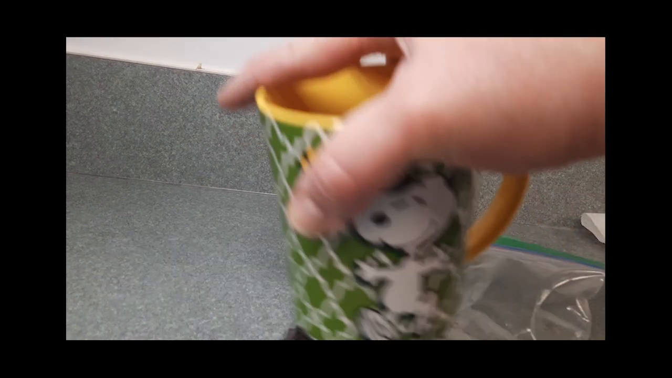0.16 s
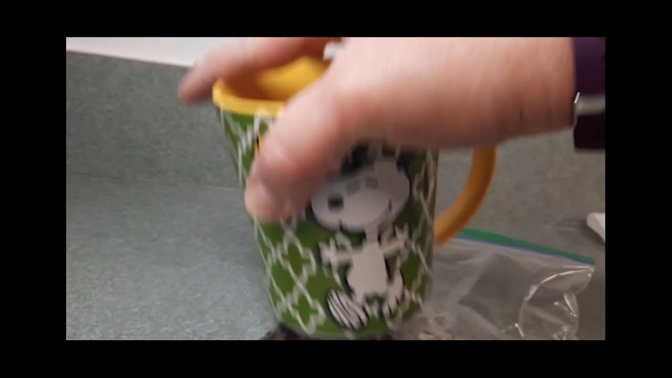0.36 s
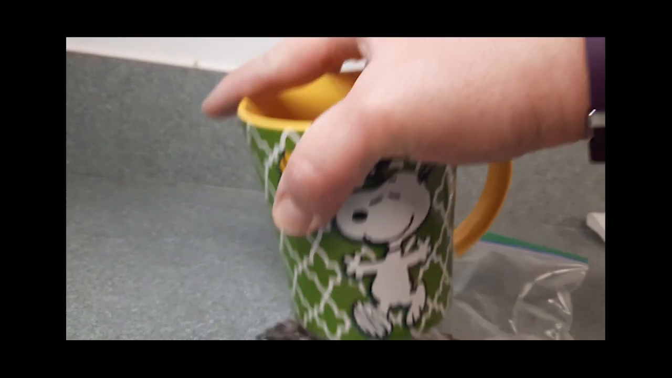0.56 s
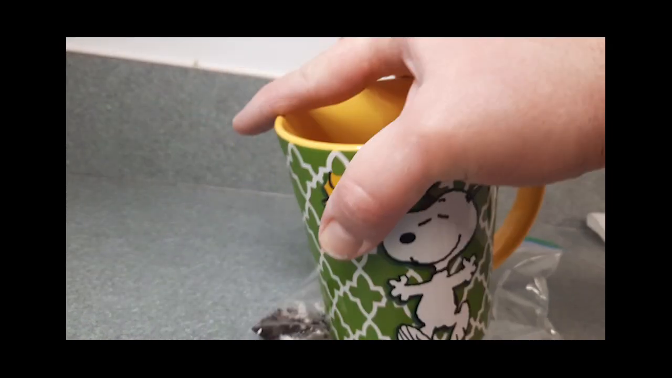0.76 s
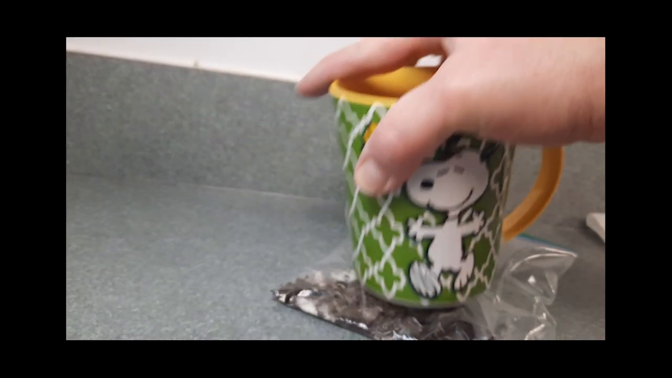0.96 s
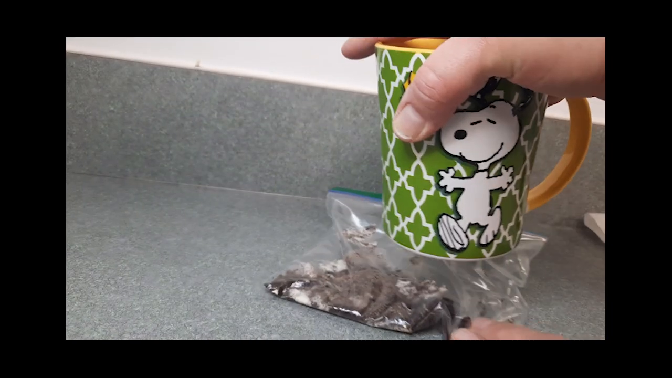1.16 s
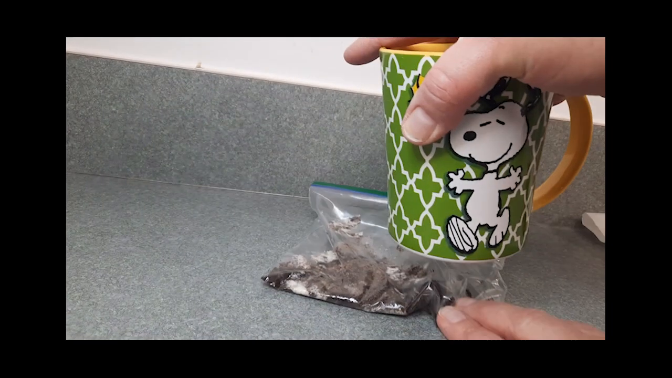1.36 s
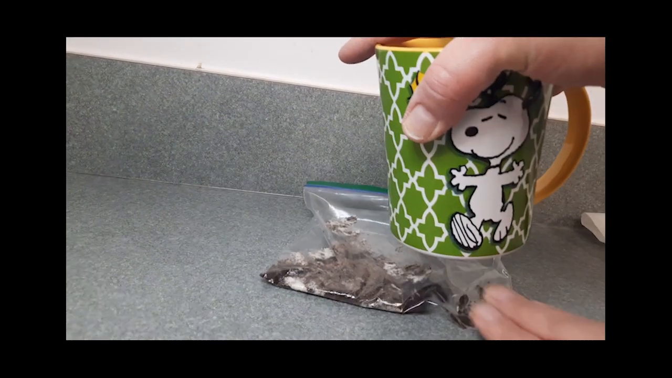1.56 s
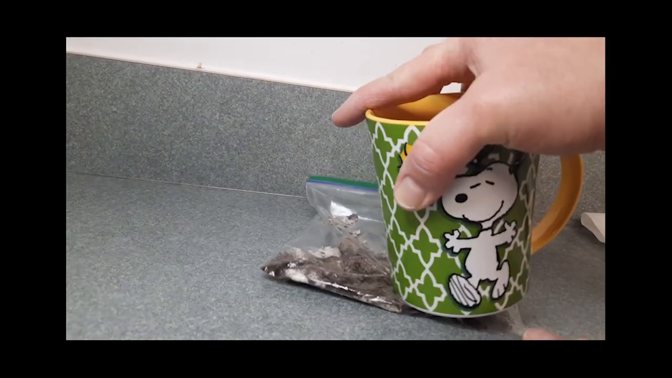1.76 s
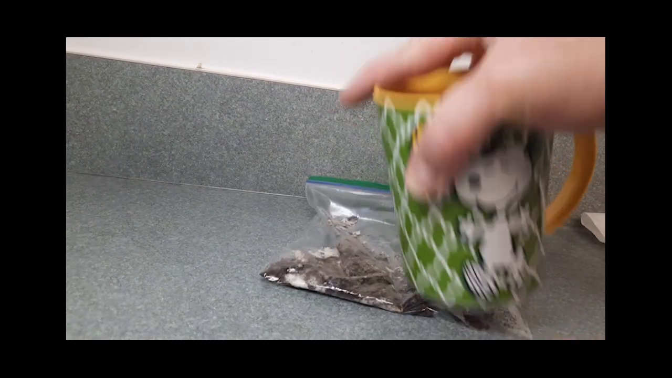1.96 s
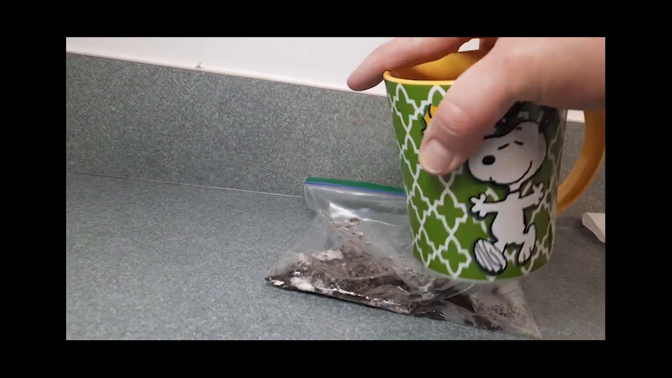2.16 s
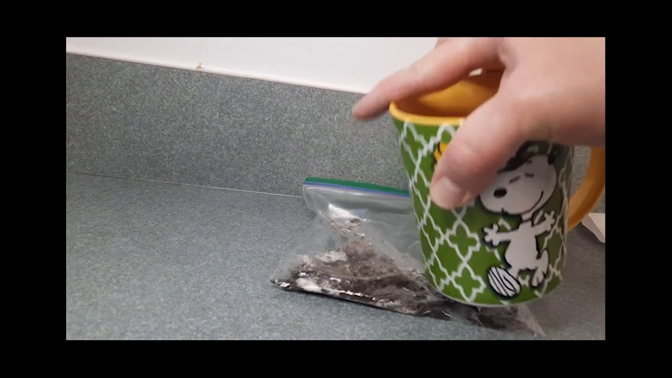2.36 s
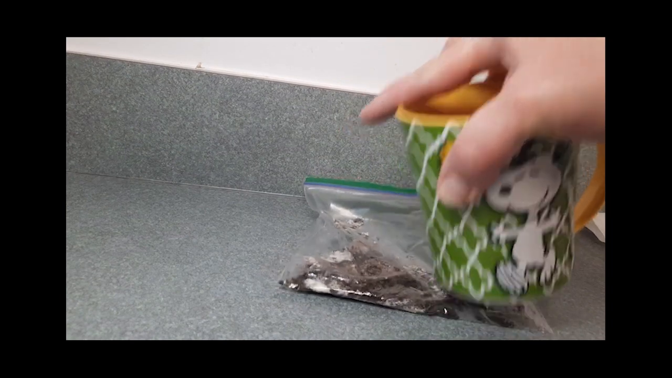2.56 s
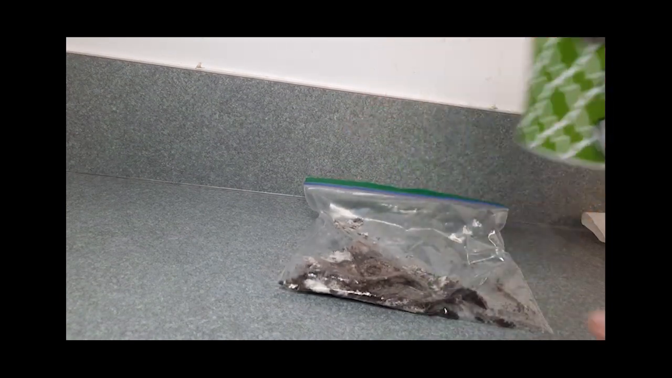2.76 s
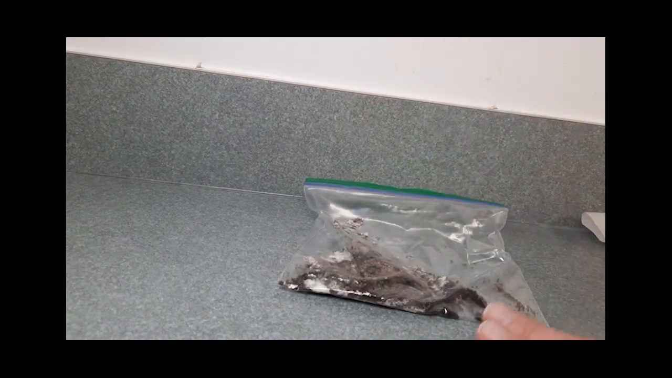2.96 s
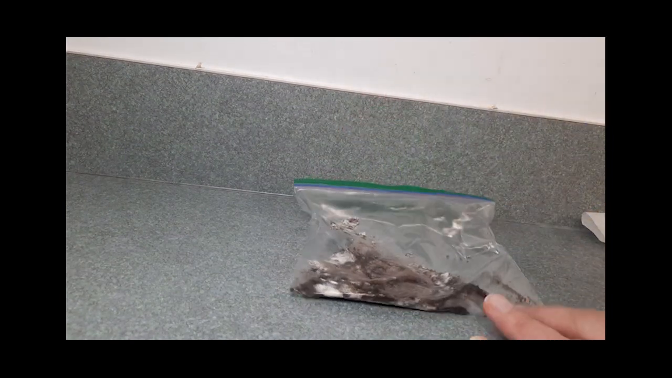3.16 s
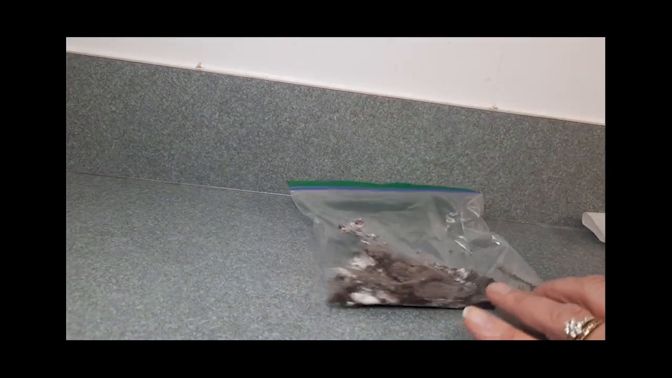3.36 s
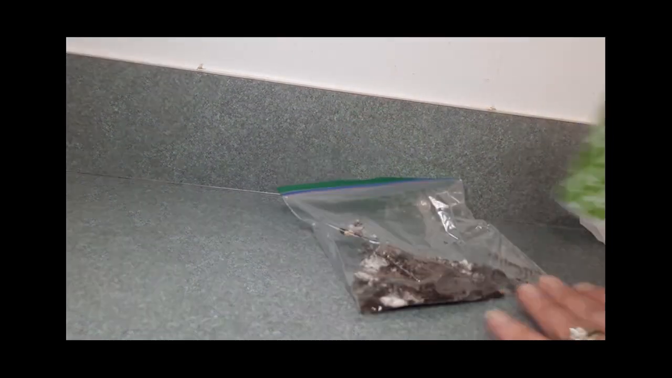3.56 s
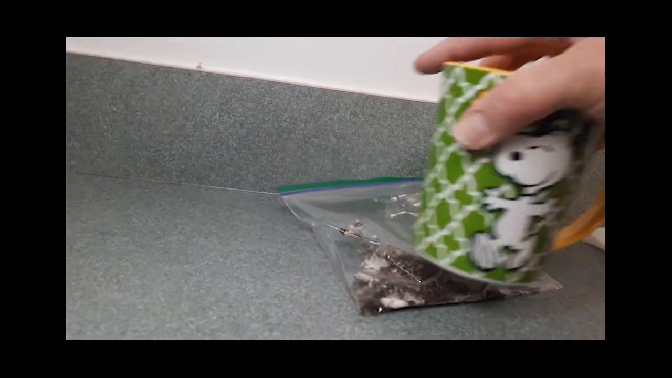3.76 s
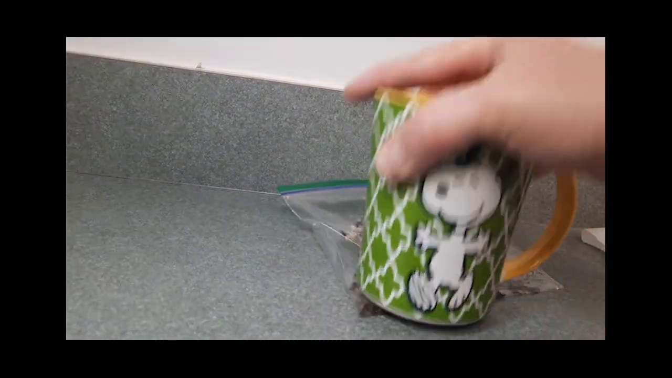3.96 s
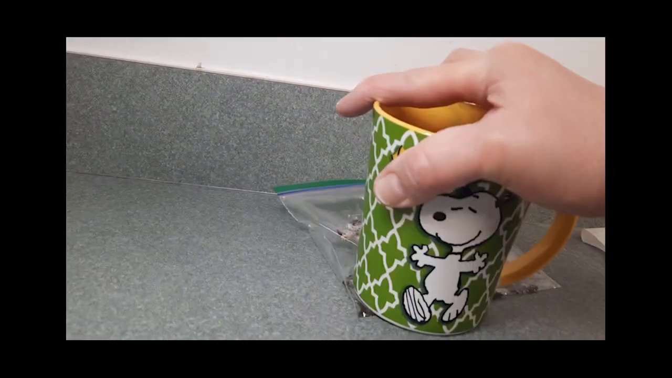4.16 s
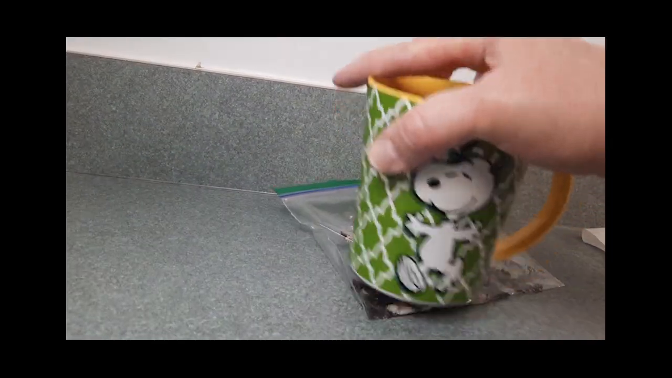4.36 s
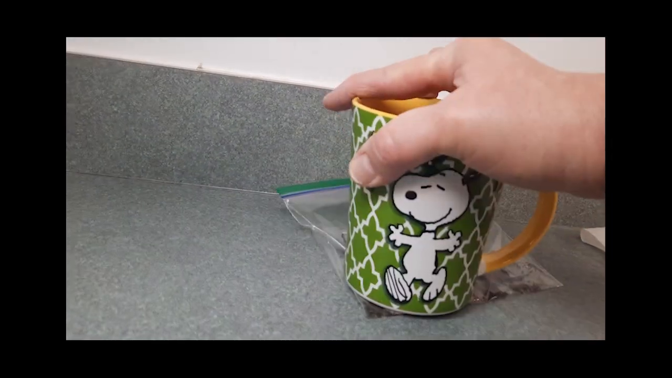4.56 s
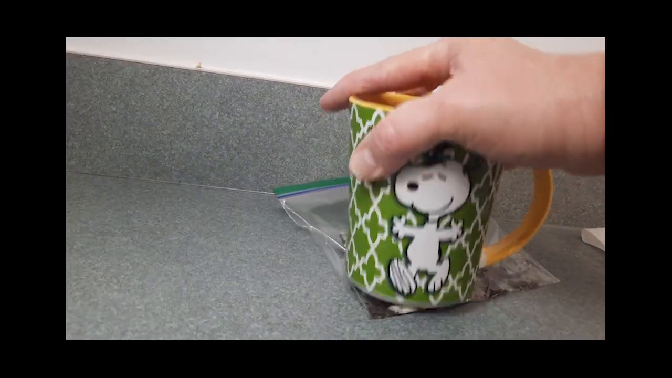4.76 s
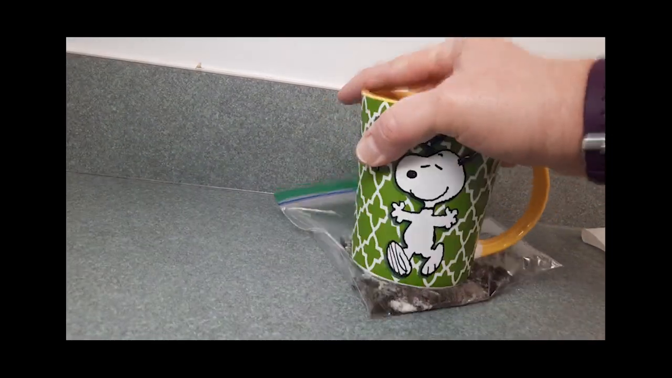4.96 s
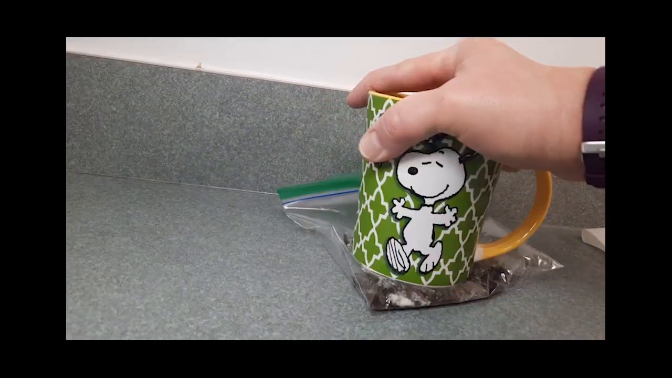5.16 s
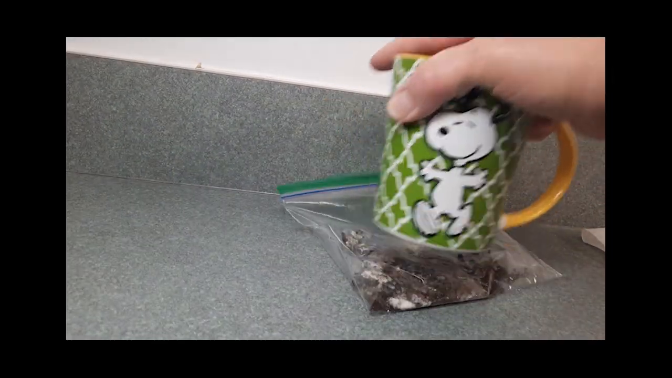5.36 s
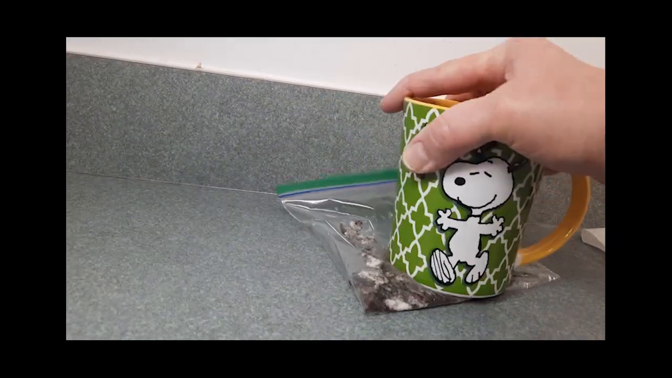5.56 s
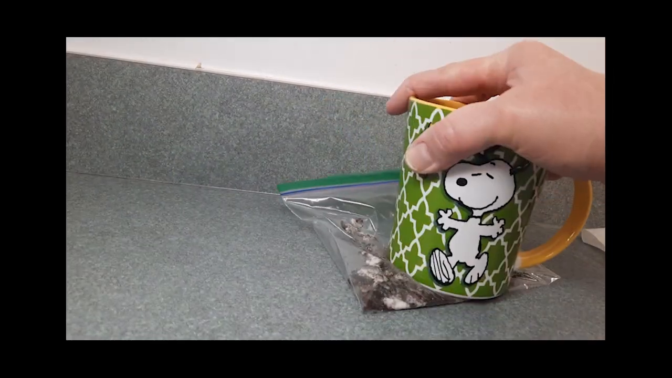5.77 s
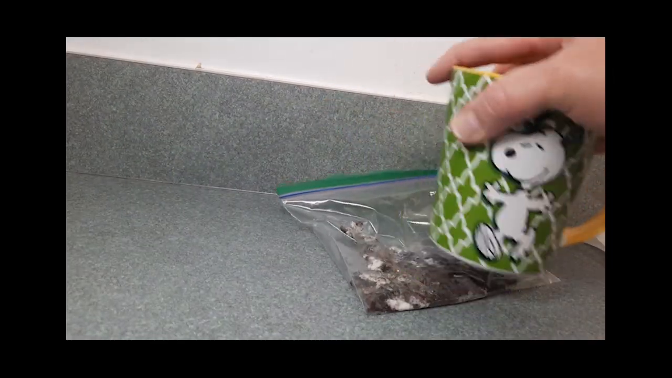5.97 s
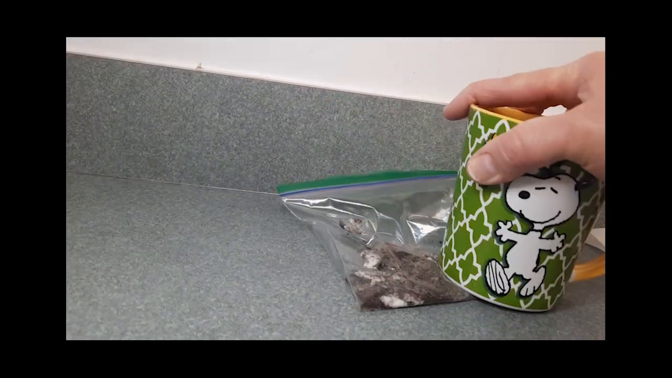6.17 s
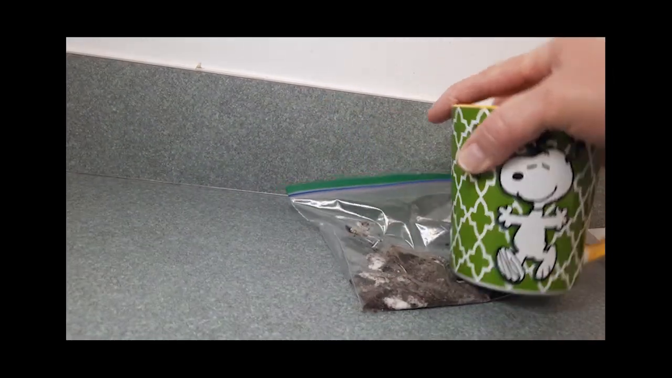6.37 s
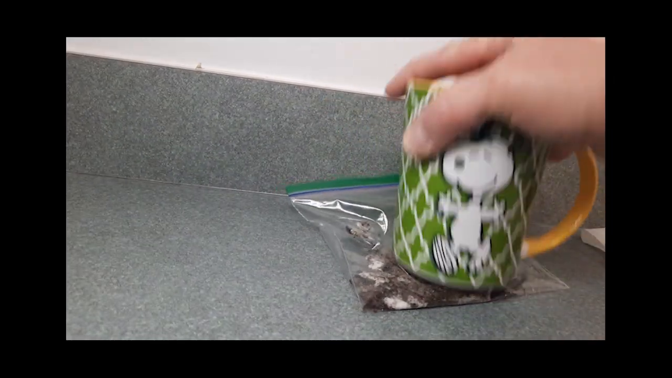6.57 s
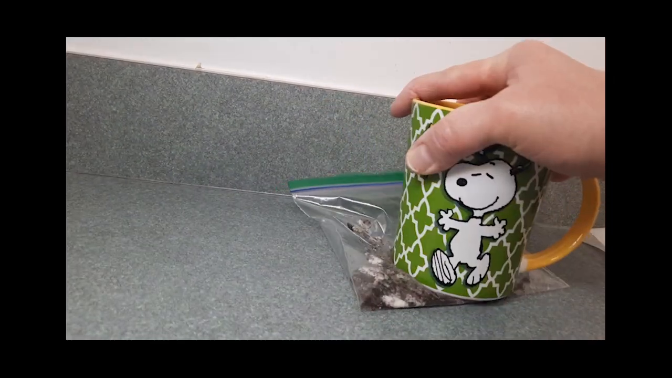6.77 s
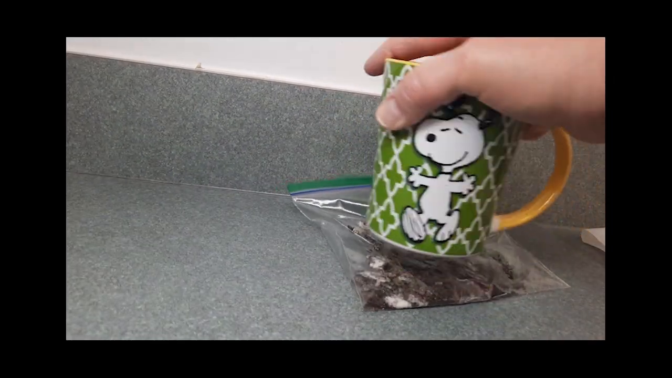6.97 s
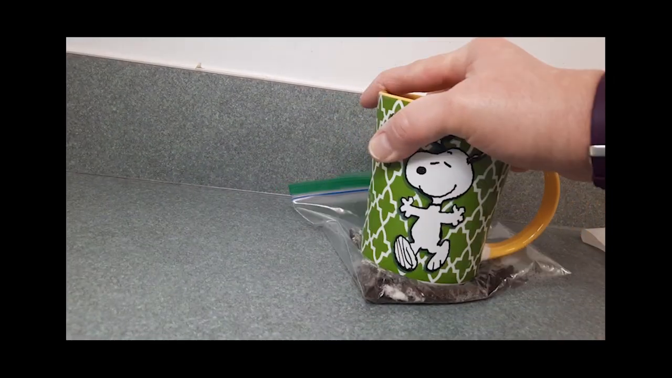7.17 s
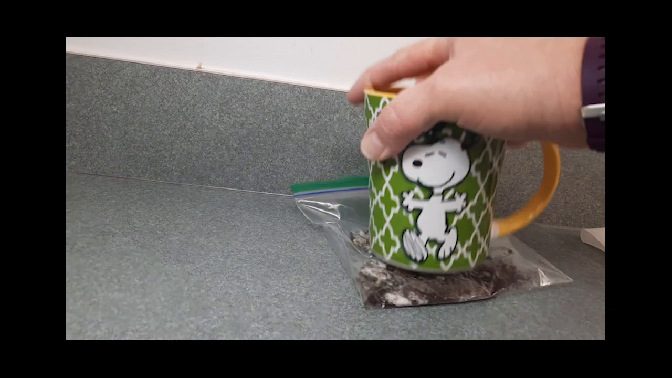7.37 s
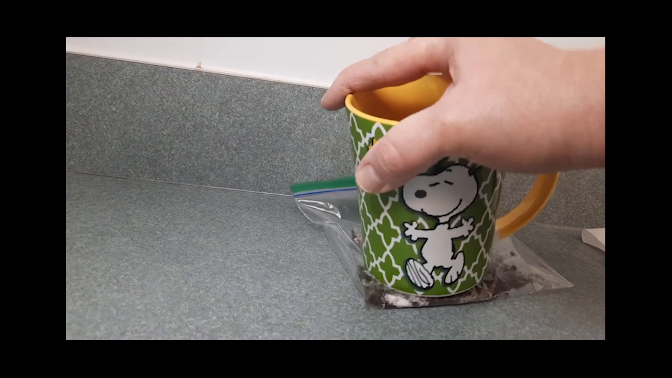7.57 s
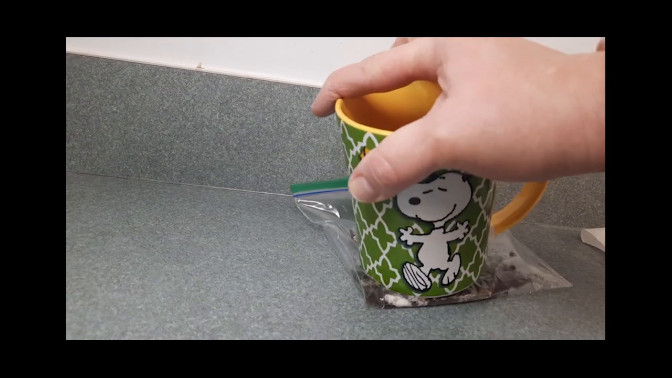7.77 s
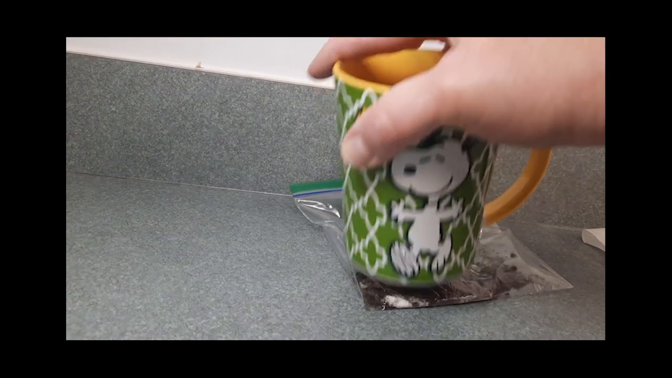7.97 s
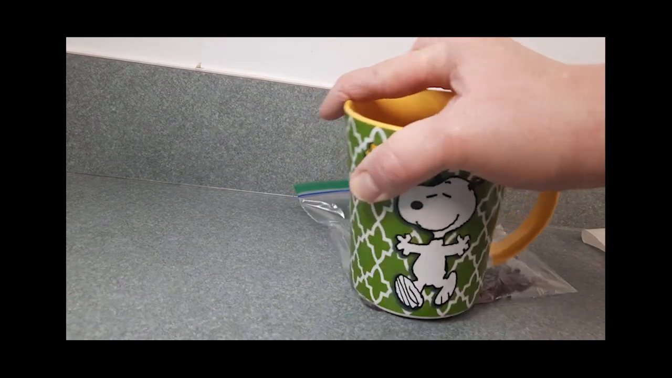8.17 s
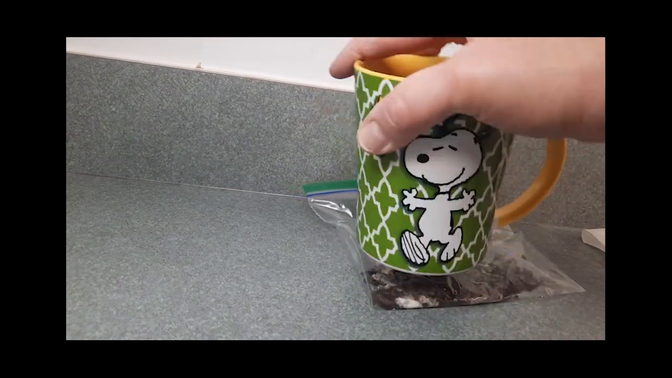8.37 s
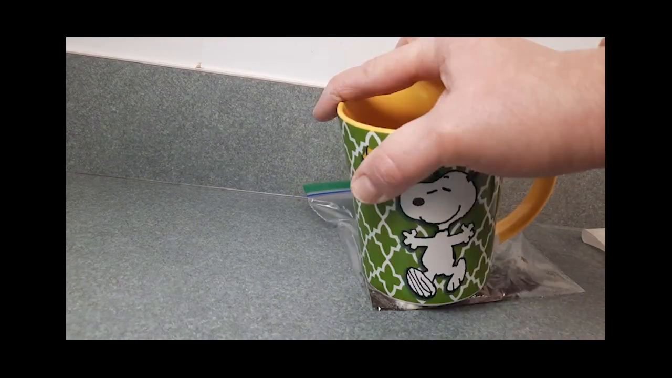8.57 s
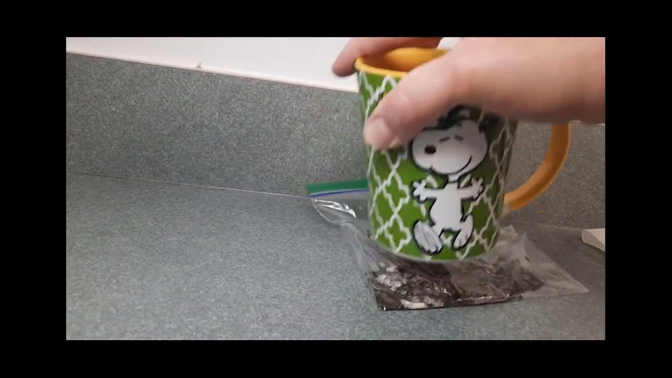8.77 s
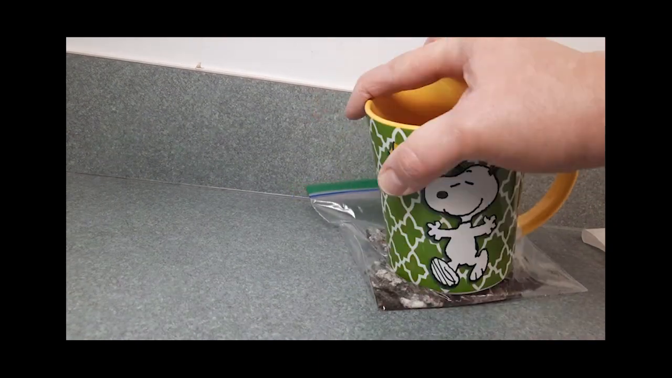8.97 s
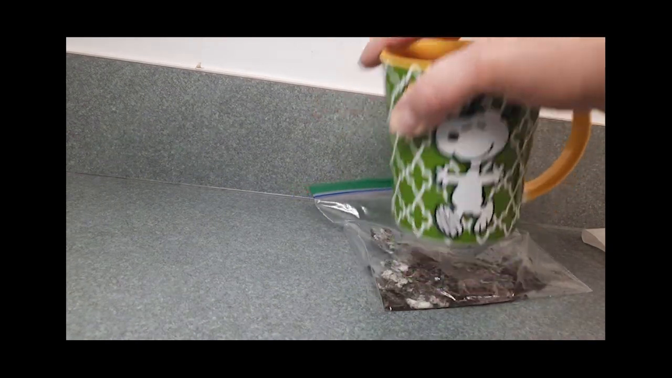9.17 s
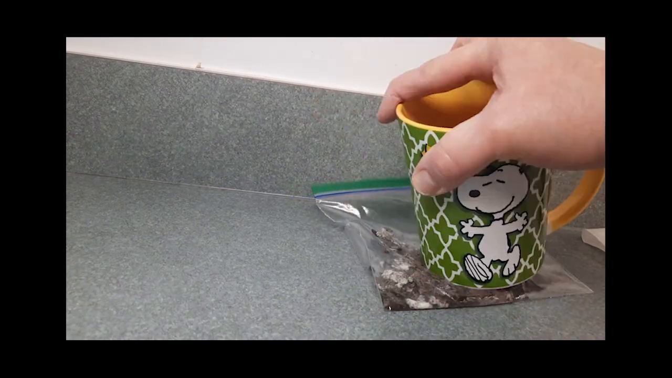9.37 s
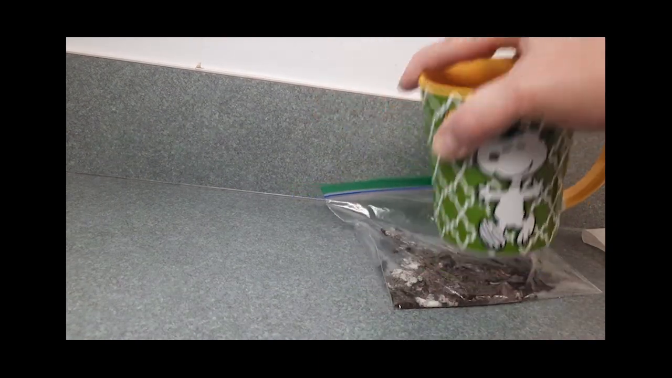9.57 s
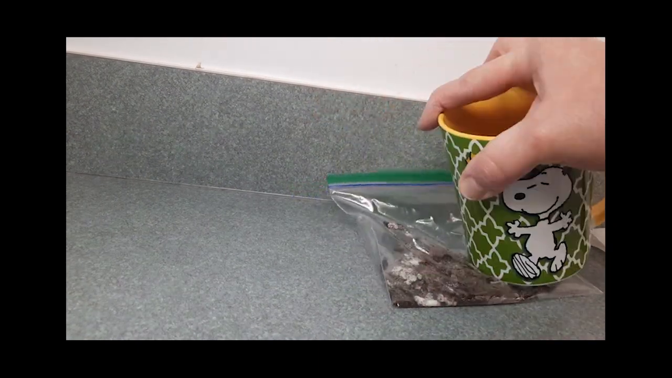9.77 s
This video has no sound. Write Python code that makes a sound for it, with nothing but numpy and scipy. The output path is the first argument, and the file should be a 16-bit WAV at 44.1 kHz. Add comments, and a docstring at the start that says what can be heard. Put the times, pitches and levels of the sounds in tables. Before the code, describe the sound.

Very close in a small, quietly humming kitchen, a ceramic mug thumps a plastic bag of cookies on a hollow counter. Four quick hard knocks come first, then another cluster with crunches and snaps. After a pause with bag rustling, a light drag and tiny metallic ring clinks, the pounding resumes at about two blows per second, mixed with gritty grinding, until the end.

```python
"""In a quiet, humming kitchen a ceramic mug pounds a plastic bag of cookies on a hollow counter, close by.
Each blow is a clack, a short pressure pulse and a set of decaying counter modes. The bag and its crumbs
rustle as grainy noise and snap in short coloured bursts; crumbs grinding also shake the counter.
The mug wall and touching finger rings sound as decaying modes, and the room adds a diffuse tail."""
import sys
import numpy as np
from scipy import signal
from scipy.io import wavfile
from scipy.ndimage import uniform_filter1d

SR = 44100
rng = np.random.default_rng(int(sys.argv[2]) if len(sys.argv) > 2 else 0)


def log_audio(samples):
    """Write samples as a 16-bit WAV file to the path given in sys.argv[1]."""
    # one column per channel
    frames = np.atleast_2d(samples).T
    # limit to full scale, then quantise
    limited = np.clip(frames, -1, 1)
    pcm = np.round(limited * 32767).astype(np.int16)
    wavfile.write(sys.argv[1], SR, pcm)


N = 433503

# Likeness of the diffuse sound in the two channels.
# Each row: frequency in Hz, left-right correlation from -1 to 1.
LIKENESS = [(60, 0.93), (130, 0.97), (290, 0.85), (640, 0.72), (1410, -0.12), (3100, 0.25), (6820, -0.14),
            (15000, 0.44)]
STEPS = np.arange(0, N + 16, 16) / SR  # times of the gain curves, s


def amp(db):
    """Level to amplitude: 20 dB is a factor of ten."""
    return 10 ** (np.asarray(db) / 20)


def evened(x):
    """Normalization to unit root-mean-square value."""
    return x / np.sqrt(np.mean(x ** 2) + 1e-20)


def sides(pan_db):
    """Level difference between the channels: left and right gains, as a column."""
    return amp([[pan_db / 2], [-pan_db / 2]])


def read(points, hz):
    """Interpolation of a curve along a logarithmic frequency axis."""
    f, value = np.transpose(points)
    return np.interp(np.log(hz + 1), np.log(f + 1), value)


def add(mix, s, sound):
    """Superposition: a sound is summed into the mix from time s, in seconds."""
    part = mix[:, round(s * SR):][:, :sound.shape[1]]
    part += sound[:, :part.shape[1]]


def ring(hz, db, t60, rise=.0005):
    """Free vibration of one damped mode: a sine that falls by 60 dB in t60 seconds."""
    t = np.arange(SR // 3) / SR
    decay = amp(db - 60 * t / t60)
    return decay * np.sin(2 * np.pi * hz * t) * (1 - np.exp(-t / rise))


def correlated(first, second, hz):
    """Partial coherence: the right channel shares a set part of the left at each frequency."""
    same = np.clip(read(LIKENESS, hz), -1, 1)[:, None]
    return np.array([first, same * first + np.sqrt(1 - same ** 2) * second])


def noise(points, patchy_db):
    """Random-phase synthesis: two-channel noise of a given spectrum with drifting patches."""
    hz = np.fft.rfftfreq(512, 1 / SR)
    a, b, c, d, patches = rng.standard_normal((N // 128 + 5, 257, 5)).T
    patches = uniform_filter1d(patches, 8, 0)  # smooth over frequency, then time
    patches = evened(uniform_filter1d(patches, 8, 1))
    z = correlated(a + 1j * b, c + 1j * d, hz)
    z *= amp(read(points, hz)[:, None] + patchy_db * patches)
    return signal.istft(z, nperseg=512, noverlap=384)[1][:, :N]


def crackle(per_s, spread_db):
    """Shot noise: sparse decaying bumps, about half a millisecond long, a few of them large."""
    size = amp(spread_db * np.minimum(rng.exponential(1, N), 4))
    size = size * (rng.random(N) < per_s / SR)
    return signal.lfilter([1], [1, -.96], size)


def hum():
    """Stationary background noise: a steady spectrum, strongest in the bass."""
    # Spectrum of the quiet kitchen. Each row: frequency in Hz, relative level in dB per Hz.
    hum_spectrum = [(24, -59), (40, -19), (90, -6), (107, 2), (164, -10.5), (233, 1), (265, -10.5),
                    (358, -8.5), (438, -32), (639, -38.5), (865, -19.5), (1360, -43), (16500, -39)]
    return sides(1.5) * amp(-73.5) * evened(noise(hum_spectrum, patchy_db=1.0))


def kitchen_reverberation(x):
    """Diffuse reverberation: sparse taps of random sign, each band dying at its own speed."""
    # Decay of the room. Each row: frequency in Hz, time to fall by 60 dB in seconds.
    room_decay = [(100, 0.39), (400, 0.37), (620, 0.23), (1500, 0.15), (5000, 0.15), (15000, 0.17)]
    taps = np.zeros((2, SR // 2))
    at = np.arange(200, SR // 2 - 20, 20) + rng.integers(0, 20, (2, (SR // 2 - 201) // 20))
    np.put_along_axis(taps, at, rng.choice([-1., 1.], at.shape), 1)
    hz, t, z = signal.stft(taps, SR, nperseg=1024)
    z = correlated(z[0], z[1], hz)  # bass arrives nearly alike in both channels
    z = z * amp(-60 * t / read(room_decay, hz)[:, None])
    tail = signal.istft(z, SR, nperseg=1024)[1]
    tail = tail / np.linalg.norm(tail[0])
    return signal.fftconvolve(x.mean(0)[None], tail, axes=1)[:, :N]


def clinks():
    """Modal excitation by contact: finger rings touch, their modes shared unequally between channels."""
    # Modes of the finger rings, one list a ring.
    # Each row: frequency in Hz, relative level in dB, time to fall by 60 dB in seconds.
    ring_modes = [
        [(6266, -15, .12), (10890, -7, .08), (13930, -9, .12), (14050, 0, .14)],
        [(9212, -3, .1), (10466, -7, .1), (15490, -4, .1), (15550, 0, .12)],
        [(7800, 0, .1), (13374, -4, .12)],
    ]
    # Touches as the hand moves. Each row: start in seconds, then the relative level in dB of each ring.
    touches = [(.145, -56, -71, -74.5), (.401, -67.5, -79.5, -80.5), (1.301, -45, -50, -68),
               (1.327, -38.5, -59, -51), (3.493, -43, -41.5, -67), (3.533, -56, -38, -57),
               (3.552, -48, -44, -63), (3.568, -64, -47, -69.5), (3.774, -35.5, -48.5, -44),
               (3.8, -29, -62, -42), (3.857, -52, -73, -70), (3.922, -57.5, -57.5, -67),
               (4.144, -44.5, -81, -53), (4.18, -51, -76, -64)]
    out = np.zeros((2, N))
    rings = [np.array([ring(*mode) for mode in modes]) for modes in ring_modes]
    shares = rng.standard_normal((len(touches), len(ring_modes), 2, 4))
    for (s, *rings_db), touch in zip(touches, shares):
        for db, modes, share in zip(rings_db, rings, touch):
            add(out, s, amp(db + 2.0 * share[:, :len(modes)]) @ modes)
    # the hand is off to one side: the right channel is 4 samples later
    return sides(-2.5) * np.array([out[0], np.roll(out[1], 4)])


def mug():
    """Free vibration after release: the wall of the mug sings briefly as it leaves the bag."""
    # Modes of the wall. Each row: frequency in Hz, relative level in dB, time to fall by 60 dB in seconds.
    wall_modes = [(2455, 0, .1), (3856, -2, .16)]
    # Moments when the mug rings free. Each row: start in seconds, level in dB.
    lifts = [(.085, -52), (.775, -61), (.264, -44), (.5, -49.5), (2.47, -51.5), (6.67, -58), (8.088, -45.5)]
    out = np.zeros((2, N))
    wall = sum(ring(*mode, rise=0.0035) for mode in wall_modes)
    for s, db in lifts:
        add(out, s, sides(-1.0) * amp(db) * wall)
    return out


def snaps():
    """Impulsive release: a crease or crumb gives way in a burst round one pitch, with a bright edge."""
    # Each row: start in seconds, relative peak level in dB, centre frequency in Hz,
    # level of the edge against the toned part in dB, fading time constant in milliseconds.
    releases = [(0.0179, -47.5, 1700, 9, 1.85), (0.0558, -20, 1900, -15, 7.2),
                (0.2389, -36, 1760, -5.5, 1.3), (0.4783, -31.5, 1930, -13.5, 3.7),
                (0.5516, -28.5, 2360, -33, 4.2), (0.5711, -32, 2450, 2, 1.5), (0.7068, -36, 7040, -12, 2.7),
                (0.7292, -27, 1230, -1, 3.5), (0.8111, -45, 1060, -10, 2.6), (0.8395, -26, 2480, 5, 3.2),
                (0.886, -40, 1240, -12, 2.4), (0.9946, -39, 4830, -6, 3.4), (1.0126, -24.5, 5330, -22, 2.1),
                (1.076, -33, 7840, -7, 2.4), (1.0959, -29.5, 7130, -13, 2.4), (1.1144, -44, 5890, -13, 1.4),
                (1.1588, -27.5, 8240, -10, 1.6), (1.3019, -32.5, 2990, -14, 3.8),
                (1.3244, -30, 3280, -13, 2.9), (1.4311, -39.5, 1940, -26, 3.5),
                (1.49, -43, 3000, -17.5, 3.5), (1.6926, -28.5, 2260, -12, 0.8),
                (1.7115, -6.5, 1240, -22, 4.4), (1.911, -56.5, 1630, -20, 3.6),
                (1.9894, -24.5, 2370, -15, 5.9), (1.9944, -13.5, 2120, -18, 5.5),
                (2.2368, -18, 1270, -32, 2.1), (2.3106, -29, 2520, -21, 3.9),
                (2.4433, -18.5, 920, -19.5, 5.1), (2.5561, -35.5, 2240, -20, 2.4),
                (2.5925, -33.5, 4230, -12, 5.1), (3.023, -49.5, 2310, -20.5, 4.3),
                (3.1687, -42, 2260, -10, 3.3), (3.2191, -34, 1050, -21, 2.4), (3.2565, -33, 1036, -29, 5.4),
                (3.3817, -49, 3730, -20, 2.9), (3.4231, -46, 1960, -20, 3), (3.4915, -19.5, 1980, -15, 2.8),
                (3.5329, -23.5, 1590, -5, 3), (3.6401, -38, 1230, -23, 4.1), (3.71, -41, 2340, -9, 2.7),
                (3.7304, -31, 4630, -11, 3), (3.7773, -18, 3740, -13, 2.6), (3.8367, -20.5, 2080, -24, 7.2),
                (3.9215, -48.5, 3000, -5.5, 2.1), (3.9355, -44, 2290, -18, 3.9),
                (4.0083, -24, 2700, -24, 2.4), (4.0647, -26, 1140, -15, 3.6), (4.118, -9, 926, -40, 3.5),
                (4.3181, -40, 2020, -21, 2.4), (4.356, -36.5, 2040, -5, 2.2), (4.3779, -40, 2120, -29, 2.4),
                (4.4822, -41, 1960, -16, 2.4), (4.4957, -16.5, 2000, -18.5, 3.5),
                (4.566, -31, 926, -25, 2.4), (4.7649, -51, 1410, 0, 2.4), (4.807, -44.5, 1636, -20, 2.1),
                (4.9437, -54, 1540, -9, 2), (4.9696, -35, 3220, -29, 2), (4.9955, -13, 1520, -12.5, 3.7),
                (5.0624, -22, 1800, -18, 1.5), (5.0709, -54, 931, -22, 2.4), (5.1751, -34, 2350, -33, 2.1),
                (5.254, -62, 2790, -8, 2), (5.2674, -29, 2000, -32, 2.6), (5.3098, -25.5, 2110, -37, 3.3),
                (5.3642, -43, 1630, -25.5, 3.1), (5.4645, -35, 1530, -17, 3.4),
                (5.4834, -29, 1650, -10, 2.4), (5.5338, -8.5, 1560, -23, 1.45),
                (5.6346, -24, 1070, -21, 3.9), (5.7119, -35, 1315, -16, 3.4),
                (5.8616, -47.5, 1743, -20.5, 2.4), (6.0601, -37, 1740, -15, 2.7),
                (6.0746, -18.5, 1230, -22.5, 1.5), (6.0955, -14.5, 970, -5, 3.1),
                (6.198, -36.5, 1250, -12, 4.6), (6.3056, -30, 1270, -28, 3.3),
                (6.3425, -29, 1760, -23, 3.1), (6.4048, -22, 1840, -1, 3.1), (6.6094, -27, 1280, -15, 3.2),
                (6.6273, -16.5, 1260, -21, 4.2), (6.7645, -43, 1150, -26, 1.5),
                (6.8264, -53, 1270, -9, 2.9), (6.8428, -40, 1650, -13, 3.1), (6.8643, -49, 1685, -12, 2.4),
                (6.9117, -54, 1625, -7, 2.4), (6.9306, -35, 1656, -12, 5.8), (7.0414, -52, 1520, -33, 2.6),
                (7.0564, -38.5, 1640, -19.5, 6.1), (7.0863, -17.5, 1860, -22, 3),
                (7.0993, -5.5, 1190, -27, 5.3), (7.1297, -7.5, 910, -35, 2.4),
                (7.2659, -46, 1280, -15, 2.4), (7.3103, -34, 1240, -14, 2.8), (7.3706, -34, 1620, -21, 2.4),
                (7.5847, -24, 1500, -16, 1.9), (7.5892, -18, 1240, -33, 2.1),
                (7.7214, -29.5, 1210, -25, 2.4), (7.784, -45, 1180, -14, 2.4),
                (7.7987, -37, 1570, -13, 2.6), (8.0456, -35, 2040, -2, 3), (8.0591, -48, 940, 15, 2.4),
                (8.1873, -35, 929, -26, 4.7), (8.319, -41, 3770, -21, 2.4), (8.5061, -31, 1606, -17, 2.8),
                (8.9151, -24, 1380, -15, 2.7), (8.9186, -20.5, 1230, -19, 3.7),
                (8.972, -33, 1280, -20, 4.1), (9.0558, -46, 3270, -20, 2.4),
                (9.3462, -17.5, 1190, -19, 2.4), (9.4439, -47, 1870, -14, 2.4),
                (9.5193, -38, 2700, -15.5, 1.9), (9.7582, -44, 1980, -16.5, 2.4),
                (9.7692, -24, 1690, -18, 2.7)]
    out, t = np.zeros((2, N)), np.arange(900) / SR
    bursts = rng.standard_normal((len(releases), 3, 900))
    bright = signal.butter(2, 6000, "high", fs=SR, output="sos")
    for (s, db, hz, treble_db, ms), burst in zip(releases, bursts):
        burst = 0.98 * burst[0] + burst[1:]  # a part common to both channels and a part of each
        burst = burst * np.exp(-1000 * t / max(ms, .2)) * (1 - np.exp(-t / 0.00015))
        band = signal.butter(2, [hz / 1.8, hz * 1.77], "band", fs=SR, output="sos")
        toned = signal.sosfilt(band, burst)
        edge = signal.sosfilt(bright, burst)
        sound = toned / abs(toned).max() + amp(treble_db) * edge / abs(edge).max()
        add(out, s, sides(2.9) * amp(db - 5.5) * sound)
    return out


def peak(s, swell, fade):
    """Growth and decay: a gain that climbs to one at s and falls away, slopes in dB per second."""
    t = STEPS - s
    steepening = 380  # dB per s squared: each fade steepens as it goes on
    return amp(np.where(t < 0, swell, -fade) * t - steepening * t ** 2)


def bag_motion():
    """Amplitude modulation by motion: gains of the rustle's body, its treble and the grinding."""
    # The mug lands on the crumbs. Each row: landing in seconds, lead of the first touch in seconds,
    # burst level in dB, tail level in dB, initial tail fading in dB per second, extra treble in dB.
    crunches = [(.057, 0.013, -34, -35, 269, 5), (0.239, 0.0097, -29, -44, 198, 0.5),
                (.478, 0.0097, -28.5, -44.5, 181.5, 0), (0.731, 0.0098, -22.5, -45.5, 203, 0),
                (1.715, .026, -29, -38.5, 194.5, 2), (1.995, 0.0073, -31.5, -38, 167, 3),
                (2.237, 0.0091, -26.5, -34, 215.5, 1.5), (2.443, 0.013, -38, -43.5, 172, 2.5),
                (3.492, 0.0086, -52, -54.5, 300, 0), (4.011, 0.022, -29.5, -35, 74.5, -2),
                (4.118, .008, -45.5, -45.5, 243.5, -21.5), (4.496, 0.027, -40, -43, 285, -2.5),
                (4.992, 0.038, -37.5, -34.5, 289, -1), (5.068, 0.04, -67.5, -30, 333, -1.5),
                (5.534, 0.0062, -37, -32.5, 245, -1.5), (6.076, 0.029, -29, -38.5, 154, -7),
                (6.628, 0.04, -36, -33, 190, -3), (7.1, 0.035, -33.5, -32, 209.5, -0.5),
                (7.59, 0.0096, -48, -37.5, 136, -2.5), (8.059, 0.022, -37, -50.5, 95, -4),
                (8.51, 0.012, -42, -44.5, 295, -1.5), (8.919, 0.018, -39, -46, 140, -2.5),
                (9.348, .01, -29, -44.5, 196, -5.5), (9.773, 0.013, -23, -37.5, 250, -5.5)]
    # The bag stirs as mug or hand moves. Each row: time of the peak in seconds, level in dB, swelling and
    # fading next to the peak in dB per second, extra treble in dB, grinding level in dB.
    stirs = [(.0, -55.5, 300, 201, -3, -52), (.15, -67.5, 58, 152, 10.5, -66), (.33, -60, 47, 257, -8, -76),
             (.57, -62, 65.5, 188, 4.5, -71), (0.847, -48.5, 147, 107, 7.5, -81),
             (1.048, -75, 26.5, 29.5, 15, -72), (1.2, -89.5, 23, 15.5, 23.5, -79),
             (1.326, -50.5, 398, 235, 5.5, -68.5), (1.549, -75.5, 18, 25, 9, -79.5),
             (1.82, -61.5, 47.5, 205, -3, -71), (2.1, -63, 51.5, 245, 7, -66.5),
             (2.598, -64, 34.5, 500, -8.5, -58), (3.171, -76, 103, 56.5, 12.5, -82.5),
             (3.222, -61, 900, 300, -15, -62), (3.259, -58, 195.5, 226, -8, -68),
             (3.418, -71, 41.5, 30.5, 7.5, -72), (3.54, -45, 452, 215.5, -11.5, -56),
             (3.789, -49.5, 139, 100, 14, -63.5), (3.931, -61.5, 54, 27.5, -2, -72.5),
             (4.359, -65, 29.5, 71, -6.5, -79.5), (4.572, -46, 383, 247.5, -4.5, -39),
             (4.814, -63, 111, 398.5, 2.5, -74), (5.271, -80, 402, 99.5, -18, -76),
             (5.327, -50, 132.5, 322, -2, -69), (5.47, -59, 904, 79, -13, -73),
             (5.52, -51.5, 286, 500.5, -2, -65), (5.648, -38, 173, 252, -3, -43),
             (5.869, -56.5, 603, 261, 1, -69), (6.32, -54, 480, 86.5, -28.5, -52.5),
             (6.421, -52, 43, 412, 3.5, -71), (6.551, -61.5, 38.5, 35.5, -40, -59.5),
             (6.84, -55.5, 293.5, 106.5, -0.5, -86), (6.936, -58, 1191, 424.5, 9, -76.5),
             (7.376, -49, 97.5, 386.5, -9, -57), (7.26, -65.5, 97, 50.5, 2, -54),
             (7.72, -52, 93, 200, -2.5, -43), (7.798, -55.5, 499, 287.5, -2.5, -56.5),
             (8.21, -53.5, 100, 150, -17, -46.5), (8.3, -60, 46.5, 548, 4, -52),
             (8.72, -73.5, 46, 139, -21.5, -70.5), (9.07, -67.5, 43, 200, 0.5, -79),
             (9.439, -84, 50.5, 100, -19, -67.5), (9.53, -69, 89, 238, 11, -58.5)]
    touch_rise_db, burst_fade = 31, 2100  # climb from first touch to burst, dB; slope, dB per s
    grind_below_tail_db = -21.5
    treble_haste = 1.254  # the treble fades this much quicker
    out = np.zeros((3, len(STEPS)))
    for s, touch, burst_db, tail_db, fade, treble_db in crunches:
        burst = amp(burst_db) * peak(s, touch_rise_db / max(touch, .002), burst_fade)
        burst = burst * (STEPS > s - touch)  # silent before the first touch
        tail = peak(s, burst_fade, fade)
        out += [burst + amp(tail_db) * tail,
                amp(treble_db) * (burst + amp(tail_db) * tail ** treble_haste),
                amp(tail_db + grind_below_tail_db) * tail]
    for s, db, swell, fade, treble_db, grind_db in stirs:
        shape = peak(s, swell, fade)
        out += amp([[db], [db + treble_db], [grind_db]]) * [shape, shape ** treble_haste, shape]
    return [np.interp(np.arange(N) / SR, STEPS, gain) for gain in out]


def rustle(body, treble):
    """Granular friction noise: film and crumbs hiss in grains, treble moving apart from body."""
    # Spectrum of the film. Each row: frequency in Hz, relative level in dB per Hz.
    film_spectrum = [(290, -25.5), (500, -3.5), (612, -7.5), (840, -10.5), (1630, -6.5), (4810, -15.5),
                     (5320, -14), (9900, -20.5), (15700, -21)]
    # Resonances of the air in the bag. Each row: frequency in Hz, width in Hz, boost in dB.
    air_resonances = [(1229, 69, 5.5), (1820, 400, 2.5), (2860, 400, 0), (4700, 900, 1)]
    film = noise(film_spectrum, patchy_db=3.0)
    for hz, width, db in air_resonances:
        resonance = signal.lfilter(*signal.iirpeak(hz, hz / width, fs=SR), film)
        film = film + (amp(db) - 1) * resonance
    below_2200, below_6500 = [signal.sosfilt(signal.butter(2, hz, fs=SR, output="sos"), film)
                              for hz in (2200, 6500)]
    bands = below_2200, below_6500 - below_2200, film - below_6500
    common = .7 * crackle(200., 4.5)  # grains heard in every band, beside those of each band
    low, middle, high = [band * evened(1 + common + .5 * crackle(260.0, 5.8)) for band in bands]
    return sides(0.6) * (body * evened(low + middle) + treble * evened(high))


def counter_modes():
    """Modal response of panels damped at first by the resting mug: one array a group of modes."""
    # Lowest, deep, middle and high modes, one list each. Each row: frequency in Hz, relative level in dB,
    # undamped time to fall by 60 dB in seconds, left minus right level in dB.
    panel_modes = [
        [(54, 0, .3, 3), (72, -10, .2, 3)],
        [(90, -14, .3, 3), (108, -7, .35, 3), (141, 0, .36, 1), (156, -10, .25, 1), (170, -9, .3, 1),
         (191, -8, .3, 1)],
        [(238, -8, .2, 1), (256, -8, .2, 1), (296, -5, .25, 0), (326, 0, .14, -1), (340, -5, .2, -1),
         (368, -8, .15, 0), (402, -14, .2, 0)],
        [(512, -18, .14, 3), (545, -11, .12, 4), (590, 0, .08, 11), (609, -2, .07, 9), (632, -8, .07, 5),
         (686, -12, .08, 6), (790, -15, .08, 3), (920, -19, .06, 3), (1240, -24, .05, 3)],
    ]
    pressed = 0.31 + 0.9 * np.exp(-np.arange(SR // 3) / SR / 0.022)  # the mug rests on the top at first
    return [pressed * np.array([sides(pan) * ring(hz, db, t60, rise=0.0026) for hz, db, t60, pan in modes])
            for modes in panel_modes]


def blows(bodies):
    """Impact excitation: each blow clacks, pushes the air once and rings the panels."""
    # Each row: start in seconds, relative thud level in dB, thud pitch in Hz, relative levels in dB
    # of the lowest, deep, middle and high counter modes, relative clack level in dB.
    impacts = [(0.058, -4.5, 228, -25, -4.5, -31.5, -52.5, -22),
               (0.2432, 2.5, 218, -6.5, -7, -16, -15, -29), (0.48, 2, 230, -19.5, -3, -32, -15.5, -19.5),
               (0.7328, -6, 124, -26, -16, -14, -26, -23), (1.6094, -65.5, 201, -51, -46, -62, -67.5, -64),
               (1.7125, -14, 198, -17, -22.5, -25, -18, -29),
               (1.9974, -13.5, 276, -24.5, -18, -23, -33, -20.5),
               (2.0034, -11, 119, -29, -10.5, -17, -25, -34),
               (2.2403, 0.5, 243, -25, -5.5, -12, -19, -35.5), (2.4455, 3.5, 245, -27.5, -5, -9, -16, -31),
               (3.4931, -36, 355, -55, -42.5, -63, -60, -37),
               (4.0095, -39, 130.0, -24, -15.5, -18, -28, -25),
               (4.1191, -4.5, 220, -41, -15.5, -5.5, -10.5, -7.5),
               (4.4952, -18.5, 298, -21, -10, -47, -28, -72), (4.4982, -1, 240, -37, -13, -91, -32, -33.5),
               (4.5675, -19, 130.0, -46, -37, -23.5, -30, -29),
               (4.996, -19.5, 206, -48, -13.5, -25, -23, -23.5),
               (5.071, -35, 207, -24.5, -22.5, -12, -12, -14.5),
               (5.5351, -16.5, 242, -25.5, -16, -26, -28.5, -21.5),
               (5.638, -20, 244, -49.5, -43, -21.5, -32.5, -23.5),
               (5.6602, -16.5, 275, -33, -28.5, -31.5, -28, -29.5),
               (6.0763, -7.5, 257, -49, -22, -18, -16, -15),
               (6.1002, -13.5, 316, -15, -21.5, -14, -42.5, -58),
               (6.3463, -46, 340.0, -67, -33.5, -31, -42, -34),
               (6.6316, 0.5, 216, -26, -7.5, -9.5, -26, -18.5),
               (6.6571, -12, 130.0, -35.5, -12.5, -15, -14.5, -16.5),
               (7.0999, -9.5, 233, -24, -20.5, -28.5, -10.5, -26.5),
               (7.132, -11.5, 276, -51, -34, -8.5, -8.5, -10),
               (7.5893, -25, 455, -51, -19.5, -18.5, -19, -59),
               (7.7202, -31.5, 264, -52, -32, -39.5, -32, -34), (8.0616, 1, 216, -6, -8, -3.5, -15.5, -32),
               (8.5097, -18, 161, -17, -21, -33, -33, -40), (8.9189, -15.5, 258, -20, -25, -23, -24, -26.5),
               (9.3467, -21, 223, -25.5, -19, -39, -57, -29),
               (9.3532, -23.5, 236, -18.5, -45.5, -24, -27, -28),
               (9.7715, -31, 191, -38, -15, -20, -28, -34),
               (9.7795, -10, 239, -19.5, -26, -41.5, -40.5, -32)]
    out, t = np.zeros((2, N)), np.arange(-60, 200) / SR
    # the rim meets the hard top
    clack = -np.cos(2 * np.pi * 620.0 * t) * np.exp(-(t / np.where(t < 0, .0003, .0008)) ** 2)
    spots = rng.standard_normal((len(impacts), 4, 9))  # no two blows land on the same spot
    for (s, thud_db, hz, *ring_db, clack_db), spot in zip(impacts, spots):
        turn = np.arange(0, 2.5, hz / SR)  # cycles of the thud
        thud = np.sin(2 * np.pi * turn) * 1.21 * turn * np.exp(-(turn / 0.78) ** 2)
        add(out, s - .0018, sides(2.1) * amp(clack_db + 4.0) * clack)
        add(out, s, sides(2) * amp(thud_db + 3.0) * thud)
        for db, body, shares in zip(ring_db, bodies, spot):
            add(out, s, np.tensordot(amp(db - 6.5 + 2.8 * shares[:len(body)]), body, 1))
    return out


def slide(bodies):
    """Friction excitation: the bag dragged over the top rubs the middle modes with noise."""
    # One row: start in seconds, end in seconds, level in dB.
    drag = (3.72, 3.9, -48)
    start, end, db = drag
    length = round((end - start) * SR)
    rub = amp(db) * np.hanning(length) * rng.standard_normal(length)
    out, middle = np.zeros((2, N)), sum(bodies[2])
    add(out, start, signal.fftconvolve(rub[None], middle / np.linalg.norm(middle[0]), axes=1))
    return out


def grinding(bodies, grind):
    """Forced vibration: the irregular force of grinding crumbs shakes the counter modes."""
    shaken = amp(-10.0) * sum(bodies[1]) + sum(bodies[2]) + amp(-12.0) * sum(bodies[3])
    shaken = shaken / np.linalg.norm(shaken[0])
    force = grind * evened(1 + .5 * crackle(160.0, 1.6)) * rng.standard_normal(N)
    return signal.oaconvolve(force[None], shaken, axes=1)[:, :N]


def scene():
    """Superposition of direct sound, reverberation and hum."""
    body, treble, grind = bag_motion()
    bodies = counter_modes()
    knocks = blows(bodies) + grinding(bodies, grind) + slide(bodies)
    bag = rustle(body, treble) + snaps() + mug() + clinks()
    room = kitchen_reverberation(amp(-11.5) * knocks + amp(-12.5) * bag)
    return knocks + bag + room + hum()


def record(dry):
    """Transducer limits: the microphone drops the lowest bass and rounds off peaks; then a band limit."""
    x = signal.sosfilt(signal.butter(4, 44, "high", fs=SR, output="sos"), dry)
    x = x / (1 + x ** 8) ** (1 / 8)  # peaks bend near full scale
    band_limit = signal.firwin(301, 15800, window=("kaiser", 9), fs=SR)  # cutoff in Hz
    return signal.oaconvolve(x, band_limit[None], "same")


dry = scene()
out = record(dry)
log_audio(out)
```